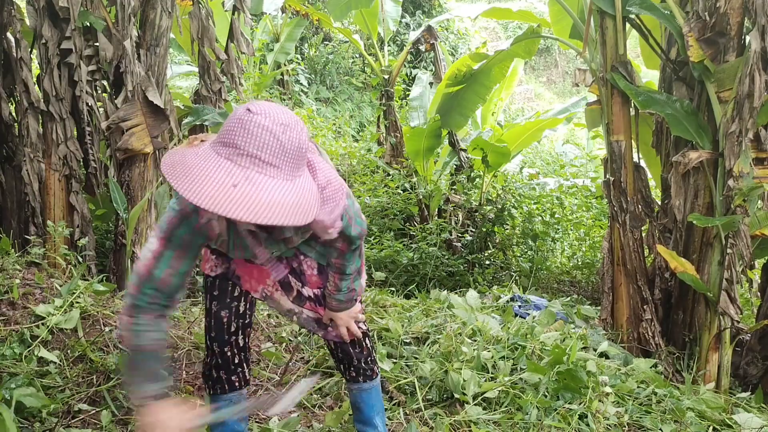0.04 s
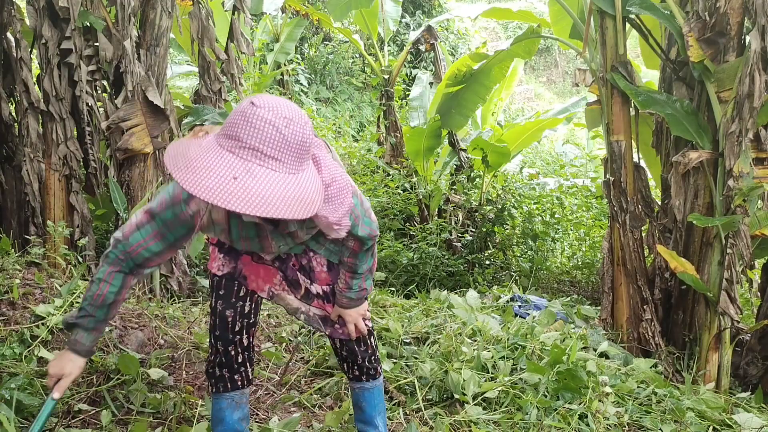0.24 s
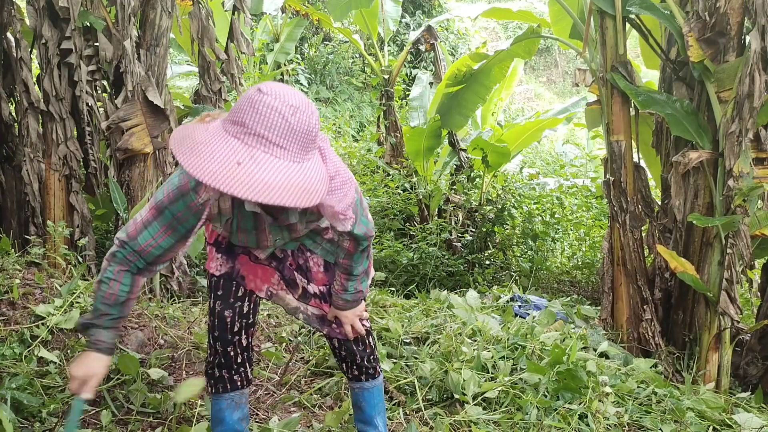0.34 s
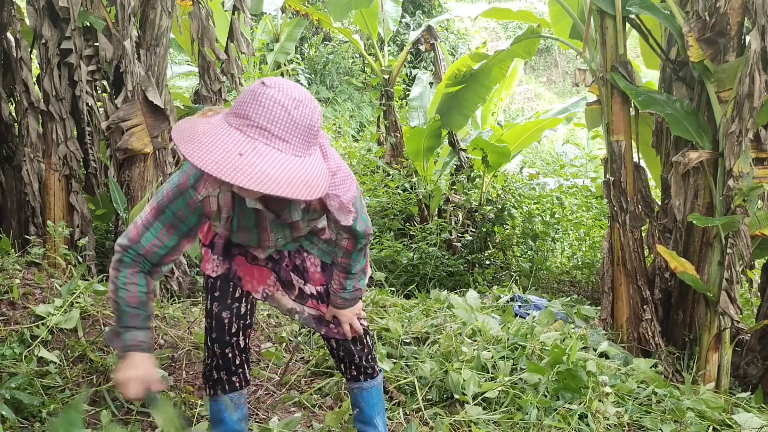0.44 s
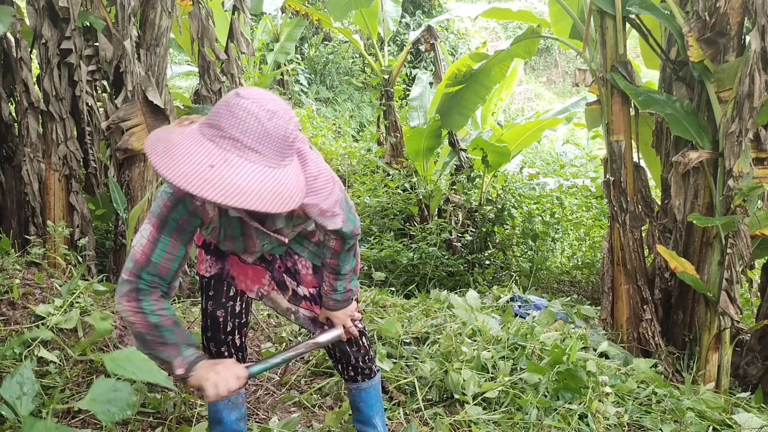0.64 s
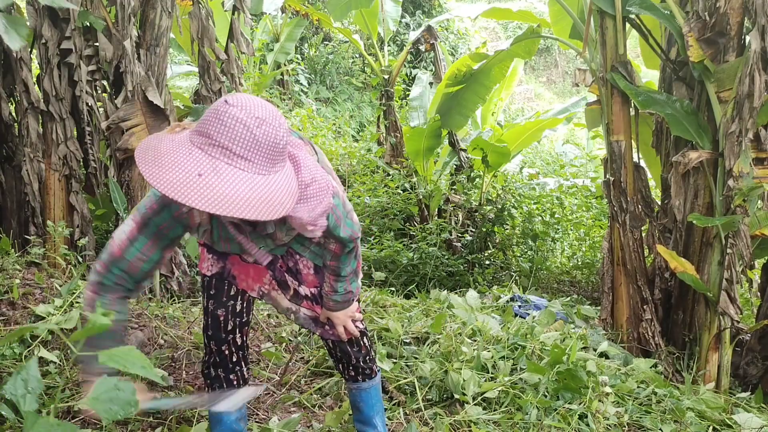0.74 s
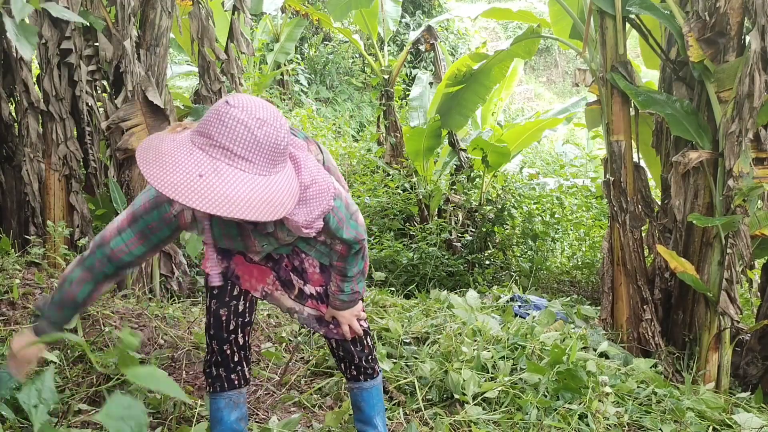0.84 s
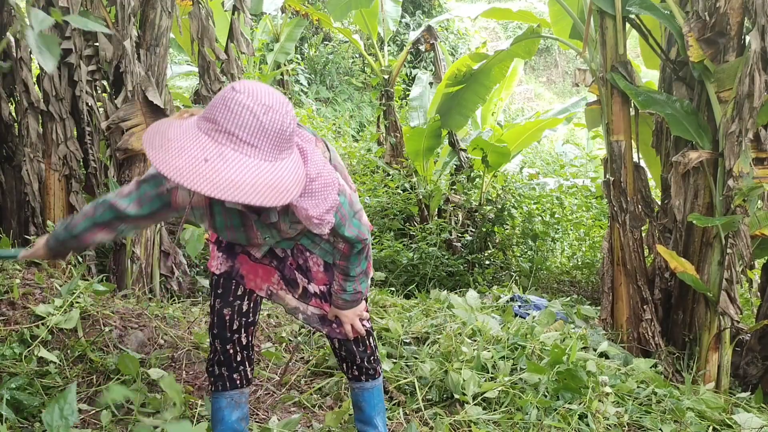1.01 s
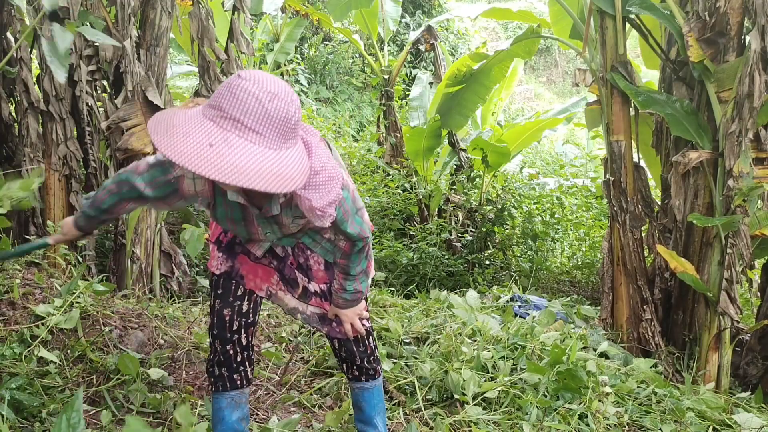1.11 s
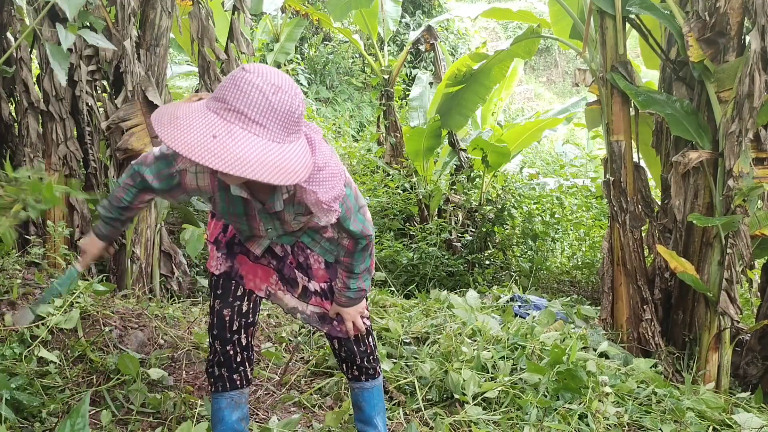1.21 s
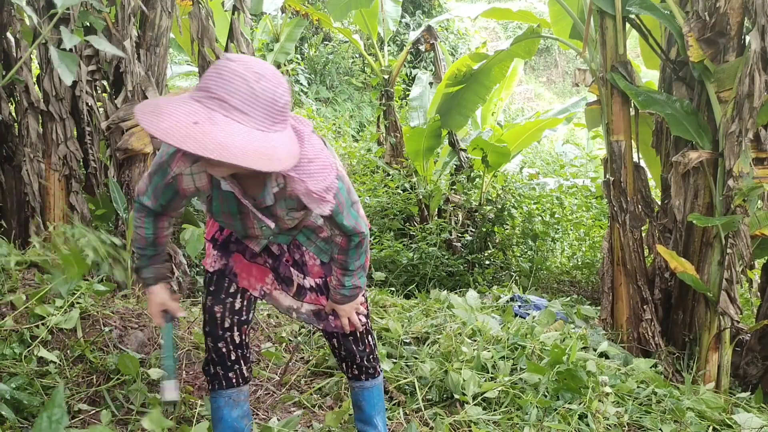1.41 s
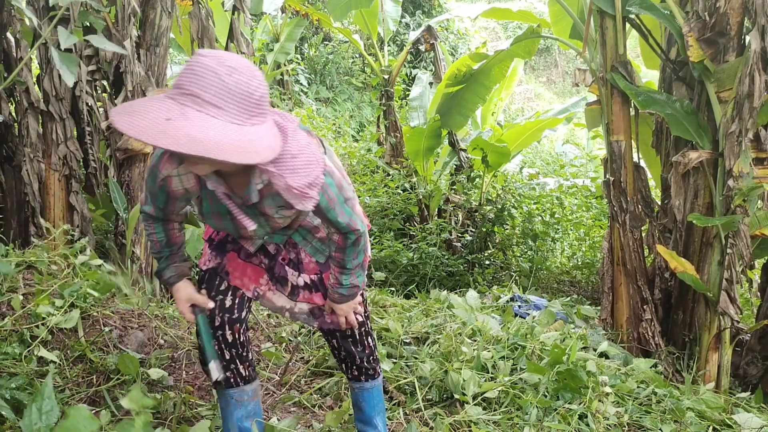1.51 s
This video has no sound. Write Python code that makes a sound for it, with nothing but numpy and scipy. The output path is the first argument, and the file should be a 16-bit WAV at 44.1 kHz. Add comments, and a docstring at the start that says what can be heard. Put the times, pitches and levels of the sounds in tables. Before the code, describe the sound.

A hand blade cuts weeds: quick tearing and a sharp chop with a brief steel ring, soft leaf rustle, then a slower rasping sweep snapping stems. Close stereo pickup in a leafy grove with faint insects and distant engine hum.

```python
"""Soft outdoor air, a far idling engine and narrow-band insects lie under a long-handled blade in a grove.
The first swing tears through stems as dense crackle; one hard chop bursts as noise and rings steel modes.
Leaves rustle as banded crackle, then a long rasping sweep snaps stems and drags the cut leaves away.
Nearby plants and trunks answer each sound with diffuse noise echoes; two spaced ports listen."""
import sys
import numpy as np
from scipy import signal
from scipy.fft import rfft, irfft, next_fast_len
from scipy.io import wavfile
from scipy.ndimage import map_coordinates

SR = 44100
rng = np.random.default_rng(int(sys.argv[2]) if len(sys.argv) > 2 else 0)


def dump_mix(stems):
    """Bounce the given channels to the path in sys.argv[1] as a 16-bit WAV at rate SR."""
    frames = np.atleast_2d(stems).T  # one column per channel
    limited = np.clip(frames, -1, 1)  # hard clip at full scale
    pcm = np.round(limited * 32767).astype(np.int16)
    wavfile.write(sys.argv[1], SR, pcm)


N = 68355
T = np.arange(N) / SR  # time [s]
# Source levels below are trims ahead of the mix in scene().


def amp(db):
    """Decibels to gain."""
    return 10 ** (np.asarray(db) / 20)


def unit(x):
    """Scale to rms 1."""
    return x / np.sqrt(np.mean(x ** 2) + 1e-20)


def along(points, hz):
    """Read a (frequency, value) curve on a log frequency axis."""
    f, v = np.transpose(points)
    return np.interp(np.log(hz + 1), np.log(f + 1), v)


def over_time(points):
    """Read a (time, level) curve at every sample."""
    return np.interp(T, *np.transpose(points))


def filtered(x, response):
    """Multiply the spectrum of x by a response of frequency."""
    n = x.shape[-1]
    padded = next_fast_len(n + 2048, real=True)
    spectrum = rfft(x, padded) * response(np.fft.rfftfreq(padded, 1 / SR))
    return irfft(spectrum, padded)[..., :n]


def coloured(x, spectrum):
    """Shape x with a (frequency, level) curve, rms 1."""
    return unit(filtered(x, lambda f: amp(along(spectrum, f))))


def band(x, hz, octaves):
    """Pass x through a steep-sided band, octaves to each side of hz, rms 1."""
    return unit(filtered(x, lambda f: np.exp(-.5 * (np.log2((f + 1) / hz) / octaves) ** 4)))


def noise(*shape):
    """White noise."""
    return rng.standard_normal(shape)


def wobble(rate):
    """A smooth random curve with rate knots a second."""
    return map_coordinates(noise(200), [T * rate + 2], mode="wrap")


def envelope(t, rise, hold, t60):
    """Linear rise, hold, then exponential fall, over the time t since the start."""
    fall = amp(-60 * np.maximum(t - rise - hold, 0) / t60)
    return np.clip(t / rise, 0, 1) * fall


def add(track, s, sound):
    """Mix a sound into a track at time s."""
    part = track[..., max(round(s * SR), 0):][..., :sound.shape[-1]]
    part += sound[..., :part.shape[-1]]


def crackle(per_s, spread_db, size=N):
    """Random tiny fractures of either sign, a few much larger than the rest."""
    strength = amp(spread_db * np.minimum(rng.exponential(size=size), 5))
    return (rng.random(size) < per_s / SR) * strength * rng.choice([-1, 1], size)


# force of the blade in the stems during each swing: (time [s], level [dB])
FIRST_FORCE = [(.19, -40), (.203, -41), (.211, -31.5), (.222, -26), (.234, -26), (.244, -20), (.256, -36.5),
               (.28, -33.5), (.31, -70), (.33, -70)]
SECOND_FORCE = [(.911, -42.5), (.92, -41), (.931, -29.5), (.94, -28), (.972, -31.5), (.995, -32),
                (1.09, -40.5), (1.125, -49), (1.25, -52)]
# colour of tearing stems in the fast and the slow swing: (frequency [Hz], relative level [dB])
FAST_TEAR_COLOUR = [(40, -60), (150, -15), (330, -3), (850, -0.5), (1250, 1.5), (1600, 1), (2200, -3),
                    (5000, -2), (9000, -5.5), (12000, -17), (15500, -12)]
SLOW_TEAR_COLOUR = [(60, -29), (200, -3.5), (450, 4), (1000, 1), (2000, 1), (4200, 2), (6200, 2.5),
                    (9000, -4), (12500, -10), (15500, -15)]
TEAR_PER_S, TEAR_SPREAD_DB = 6000, 3
CLUMP_PER_S, CLUMP_DB = 98, 2.5  # the blade meets one plant after another


def swing(force, spectrum):
    """Fibres tear in a dense, clumped crackle that follows the blade's force."""
    level = np.interp(T, *np.transpose(force), left=-120, right=-120)
    level = level + CLUMP_DB * wobble(CLUMP_PER_S)
    return coloured(crackle(TEAR_PER_S, TEAR_SPREAD_DB), spectrum) * amp(level)


# colour of the chop's burst: (frequency [Hz], relative level [dB])
CHOP_COLOUR = [(60, -26.5), (250, -16.5), (700, -6), (1150, -7), (1600, -2.5), (2700, -11.5), (3900, -1.5),
               (6000, -1), (8800, -4.5), (11000, -9), (15500, -32.5)]
CHOP_S, CHOP_DB, CHOP_RISE_S, CHOP_HOLD_S, CHOP_T60_S = .2444, -5.5, 0.00042, 0.0019, 0.014


def chop():
    """The edge hits something hard: a burst of splitting, made of coloured noise."""
    out, t = np.zeros(N), T[:SR // 8]
    burst = coloured(noise(len(t)), CHOP_COLOUR)
    shape = envelope(t, CHOP_RISE_S, CHOP_HOLD_S, CHOP_T60_S)
    add(out, CHOP_S, amp(CHOP_DB) * burst * shape)
    return out


# ringing modes of the steel: (frequency [Hz], level [dB], decay t60 [s])
STEEL_MODES = [(1102, -7, .025), (1076, -27.5, 0.36), (1156, -32, 0.202), (1282, -31, .12),
               (2795, -23.5, 0.17), (2974, -39, 0.27), (5880, -38, .2), (6870, -20, 0.11),
               (7035, -28, 0.28), (7300, -24.5, 0.24), (8394, -36.5, 0.15), (8640, -38.5, 0.184),
               (8960, -26, 0.23)]
WAVER_HZ, WAVER_PER_S = 44, 128  # how far and how fast each mode wavers


def blade():
    """The steel rings briefly after the chop; each mode's pitch wavers at random, broadening its ring."""
    out, t = np.zeros(N), T[:SR // 3]
    for hz, db, t60 in STEEL_MODES:
        pitch = hz + WAVER_HZ * wobble(WAVER_PER_S)[:len(t)]
        turns = np.cumsum(pitch) / SR + rng.random()
        add(out, CHOP_S, amp(db) * envelope(t, 0.0014, 0, t60) * np.sin(2 * np.pi * turns))
    return out


THUD_HZ, THUD_DB, THUD_T60_S = 110, -23.5, 0.031


def thud():
    """The blow gives one low push, a short decaying sine under the chop."""
    t = np.maximum(T - CHOP_S, 0)
    return amp(THUD_DB) * envelope(t, 0.0023, 0, THUD_T60_S) * np.sin(2 * np.pi * THUD_HZ * t)


# single stems snapping: (time [s], level [dB], centre [Hz], width [octaves])
STEM_SNAPS = [(0.193, -26, 9000, .4), (0.2011, -11.5, 1860, 0.23), (0.2116, -15, 1356, 0.45),
              (0.2199, -16.5, 2630, 1), (.2222, -17, 5360, .8), (0.577, -24.5, 10000, 0.47),
              (.676, -32.5, 3080, 0.72), (0.9141, -16.5, 7640, 0.48), (0.9225, -18, 4900, 0.53),
              (0.9359, -17, 4500, 0.71), (.945, -14, 3470, 0.84), (1.0433, -17, 3300, 0.99),
              (1.103, -13.5, 3270, 1.3), (1.163, -14, 4300, 0.51), (0.9795, -16, 6000, .8),
              (1.0496, -25, 5500, .8), (1.0625, -17, 4800, .7), (1.154, -31, 4000, .7)]
SPLINTER_T60_S, SPLINTER_DB = 0.027, -18.5  # level relative to the click


def snaps():
    """Thicker stems break one by one: a click of one cycle and a short splinter."""
    out, t = np.zeros(N), T[:SR // 20]
    for s, db, hz, width in STEM_SNAPS:
        u = 2 * np.pi * (hz * t - .5)
        click = u * np.exp((1 - u ** 2) / 2)
        splinter = band(noise(len(t)), hz, width) * envelope(t, 0.0001, 0, SPLINTER_T60_S)
        add(out, s, amp(db) * (click + amp(SPLINTER_DB) * splinter))
    return out


# thin stalks cracking in the sweep, one row:
# (time [s], rise [s], hold [s], decay t60 [s], level [dB], centre [Hz], width [octaves])
TWIG_CRACKS = (.93, .01, .17, .35, -38.5, 4500, 1.1)
TWIG_PER_S, TWIG_SPREAD_DB = 170, 1.5


def twigs():
    """Thin stalks crack at random, sparser than the rasp, while the sweep drags through them."""
    s, rise, hold, t60, db, hz, width = TWIG_CRACKS
    cracks = band(crackle(TWIG_PER_S, TWIG_SPREAD_DB), hz, width)
    return amp(db) * cracks * envelope(T - s, rise, hold, t60)


# leaves dragged, flung and falling; soft scuffs of boots and cloth; other insects buzzing:
# (time [s], rise [s], hold [s], decay t60 [s], level [dB], centre [Hz], width [octaves])
LEAF_RUSTLES = [(.145, 0.0084, 0.018, 0.072, -52.5, 3470, 1.36),
                (.30, 0.013, 0.025, 0.35, -46.5, 11400, 0.25), (.449, 0.0026, 0.01, 0.034, -38, 4750, 0.4),
                (0.422, 0.017, 0.039, 0.37, -42.5, 4000, 1.25), (.43, 0.01, 0.15, 0.15, -56.5, 1120, 0.13),
                (.52, .03, 0.02, 0.33, -52, 3000, 0.21), (.932, 0.0034, 0.0072, 0.027, -32, 4700, 0.34),
                (.941, 0.0033, 0.012, 0.032, -32.5, 3780, 0.31),
                (.981, 0.0074, 0.012, 0.043, -37, 3200, 0.38),
                (1.01, 0.012, 0.074, 0.06, -37.5, 3500, 0.68),
                (1.125, 0.03, 0.055, 0.031, -39.5, 3390, 0.5), (1.09, 0.02, 0.027, 0.61, -43, 6100, 0.77),
                (1.11, 0.029, 0.024, 0.42, -51.5, 1080, 0.34),
                (1.225, 0.035, 0.094, 0.84, -53.5, 3820, 0.43),
                (1.35, 0.0045, 0.027, 0.044, -50.5, 1280, 0.13),
                (1.35, 0.0035, 0.0099, 0.079, -48, 3040, 1.14), (1.377, 0.12, .1, 0.61, -53.5, 5840, 0.85)]
BOOT_SCUFFS = [(.02, 0.013, 0.03, 0.23, -56, 397, 0.31), (.46, 0.017, 0.017, 0.31, -50.5, 537, 0.69),
               (.655, 0.008, 0.014, 0.24, -50.5, 450, 0.86), (.82, 0.029, 0.048, 0.067, -55, 707, 0.48),
               (.945, 0.035, 0.027, 0.48, -47.5, 472, .6), (1.13, 0.01, 0.02, 0.96, -55, 349, 0.53),
               (1.42, 0.013, 0.047, 0.17, -53.5, 590, 0.62)]
INSECT_BUZZES = [(0, 0.021, 0.67, 0.35, -63, 6850, 0.013), (0, 0.075, 0.25, 0.27, -56.5, 3030, 0.14)]
LEAF_PER_S, LEAF_SPREAD_DB = 1900, 4.5
SCUFF_PER_S, SCUFF_SPREAD_DB = 3300, 3.0
BUZZ_PER_S, BUZZ_SPREAD_DB = 8000, 0.77


def brushing(rows, per_s, spread_db):
    """Many tiny contacts: each row is a swell of fine crackle in its own band, up to 2/3 s long."""
    out, t = np.zeros(N), T[:SR * 2 // 3]
    for s, rise, hold, t60, db, hz, width in rows:
        grain = band(crackle(per_s, spread_db, size=len(t)), hz, width)
        add(out, s, amp(db) * grain * envelope(t, rise, hold, t60))
    return out


SPACING_MS, BASS_ALIKE = 0.95, 0.96  # travel time across the ports, likeness in the bass


def diffuse(pair):
    """Two unrelated signals become sound from all around, most alike at the ports in the bass."""
    def alike(f):
        return np.clip(BASS_ALIKE * np.sinc(2 * f * SPACING_MS / 1000), -1, 1)

    mid, side = filtered(pair, lambda f: np.sqrt([1 + alike(f), 1 - alike(f)]) / np.sqrt(2))
    return np.array([mid + side, mid - side])


SCATTER_DB, SCATTER_T60_S = -1.5, 0.026


def scatter():
    """Near weeds and soil scatter the sound at once: a brief spray of diffuse noise."""
    t = T[:SR // 20]
    spray = diffuse(noise(2, len(t))) * envelope(t, 0.0012, 0, SCATTER_T60_S)
    return amp(SCATTER_DB) * unit(spray) / np.sqrt(len(t))


# decay of the grove's answer: (frequency [Hz], decay t60 [s])
GROVE_DECAY = [(200, 0.37), (1200, 0.2154), (3000, 0.42), (7000, 0.4446), (14000, 0.19)]
# strength of the grove's answer: (frequency [Hz], level [dB])
GROVE_COLOUR = [(100, -14.5), (500, -14.5), (1200, -6.5), (3000, 0.5), (4500, -4.5), (7000, -1),
                (10000, -1.5), (15000, 0)]
GROVE_DB, GROVE_BUILD_S = -1.5, 0.0072


def grove():
    """Echoes from trunks and leaves build up, then die at a rate of their own in each band."""
    n = SR // 2
    hz, t, z = signal.stft(diffuse(noise(2, n)), SR, nperseg=256)
    decay = amp(-60 * t / np.maximum(along(GROVE_DECAY, hz), .02)[:, None])
    shape = decay * (1 - np.exp(-(t / GROVE_BUILD_S) ** 2))
    # equal energy in every band before the colour
    shape = shape / np.sqrt(n * np.mean(shape ** 2, axis=1, keepdims=True))
    colour = amp(along(GROVE_COLOUR, hz))[:, None]
    return amp(GROVE_DB) * signal.istft(z * shape * colour, SR, nperseg=256)[1]


def echoed(x, echo):
    """Sound heard through one pattern of echoes, by convolution."""
    return signal.fftconvolve(x[None], echo(), axes=1)[:, :N]


REDRAW_S = .05  # time between fresh echo patterns


def redrawn_echoes(x, echo):
    """The random echo pattern is redrawn at short steps and cross-faded, so the tail stays noisy."""
    out, hop = np.zeros((2, N)), round(REDRAW_S * SR)
    fade = np.sqrt(np.hanning(2 * hop))  # overlapping pieces cross-fade
    for start in range(0, N - hop, hop):
        piece = x[start:start + 2 * hop]
        add(out, start / SR, echoed(piece * fade[:len(piece)], echo))
    return out


# level of the insect: (time [s], level [dB])
INSECT_LEVEL = [(0, -60), (.65, -61.5), (.79, -64), (.86, -56.5), (1.3, -59.5), (1.55, -60)]
INSECT_HZ, INSECT_OCTAVES = 7340, 0.037


def insect():
    """One insect trills: a very narrow band of noise with a fluttering level."""
    level = over_time(INSECT_LEVEL) + wobble(12.4)
    return amp(level) * band(noise(2, N), INSECT_HZ, INSECT_OCTAVES)


# the engine's low wandering tones: (frequency [Hz], level before the hum's swell [dB])
ENGINE_TONES = [(98, -69), (122.3, -58), (146, -57), (189, -67.5)]
# the hum swells and sinks: (time [s], level [dB])
HUM_SWELL = [(0, -2), (.12, 4.5), (.33, -9), (.43, 3), (.52, -4.5), (.63, 8), (.67, 1), (.71, 5.5),
             (.76, -6), (.8, 1.5), (.87, 8), (.93, -5), (1.2, 0), (1.37, -2.5), (1.41, 4), (1.44, 0),
             (1.55, 2.5)]
# colour of the rumble: (frequency [Hz], relative level [dB])
RUMBLE_COLOUR = [(25, -45), (60, -11.5), (130, 0.5), (200, -4.5), (400, -23.5), (1000, -65)]
RUMBLE_DB = -58  # before the hum's swell


def engine():
    """A far engine idles: low tones wandering in level and phase, with rumbling noise."""
    tones = np.zeros(N)
    for hz, db in ENGINE_TONES:
        level = amp(db + wobble(3.6))
        phase = 2 * np.pi * (hz * T + rng.random()) + 1.1 * wobble(10.02)
        tones += level * np.sin(phase)
    rumble = amp(RUMBLE_DB) * coloured(diffuse(noise(2, N)), RUMBLE_COLOUR)
    return amp(over_time(HUM_SWELL)) * (tones + rumble)


# colour of the outdoor air: (frequency [Hz], relative level [dB])
AIR_COLOUR = [(25, -36), (130, -3.5), (260, -2), (420, 0), (750, 0.5), (1050, -1.5), (1650, -2),
              (2300, -5.5), (3000, -10.5), (4200, -12), (6000, -16.5), (8500, -19), (15000, -37.5)]
AIR_DB = -51


def air():
    """Soft outdoor air: diffuse noise with a slightly unsteady level."""
    return amp(AIR_DB + 0.89 * wobble(13.73)) * coloured(diffuse(noise(2, N)), AIR_COLOUR)


LAG_MS = 0.2468  # how much later the cutting reaches the left port
STEM_ECHO_DB = -6  # snapping stems are heard mostly directly


def scene():
    """The cutting reaches the left port a little later than the right; plants and trunks answer."""
    hit = chop() + blade()
    tearing = swing(FIRST_FORCE, FAST_TEAR_COLOUR) + swing(SECOND_FORCE, SLOW_TEAR_COLOUR)
    stems = snaps() + twigs()
    leaves = brushing(LEAF_RUSTLES, LEAF_PER_S, LEAF_SPREAD_DB)
    scuffs = brushing(BOOT_SCUFFS, SCUFF_PER_S, SCUFF_SPREAD_DB)
    plants = tearing + leaves + scuffs

    # half the lag on each port: left late, right early
    cutting = amp(3.5) * hit + thud() + plants + stems
    direct = filtered(cutting, lambda f: np.exp(np.outer([-1, 1], 1j * np.pi * f * LAG_MS / 1000)))

    spread = plants + amp(STEM_ECHO_DB) * stems
    near = amp(-5.5) * echoed(hit, scatter) + redrawn_echoes(spread, scatter)
    # three independent draws of the hit are echoed and averaged in power, for a smoother tail
    chop_echo = sum(echoed(chop() + blade(), grove) for draw in range(3)) / np.sqrt(3)
    far = amp(-1.5) * chop_echo + amp(1.5) * redrawn_echoes(spread, grove)

    # other insects buzz for a while and stop
    buzzes = np.array([brushing(INSECT_BUZZES, BUZZ_PER_S, BUZZ_SPREAD_DB) for port in range(2)])
    return amp(-3.5) * direct + near + far + buzzes + insect() + engine() + air()


# how much louder the left port is than the right: (frequency [Hz], difference [dB])
PORT_BALANCE = [(100, 0), (1200, 0.5), (3000, 1), (5000, 0), (7000, 10), (8800, -8), (12000, -1),
                (15000, 0)]
CEILING, TOP_HZ = 0.86, 15400  # amplitude limit, upper cutoff


def record(dry):
    """Each port has its own colour; a soft ceiling rounds the peaks and a steep cutoff ends the treble."""
    x = filtered(dry, lambda f: amp(np.outer([.5, -.5], along(PORT_BALANCE, f))))
    x = x / (1 + np.abs(x / CEILING) ** 6) ** (1 / 6)
    return filtered(x, lambda f: 1 / np.sqrt(1 + (f / TOP_HZ) ** 120))


dry = scene()
out = record(dry)
dump_mix(out)
```